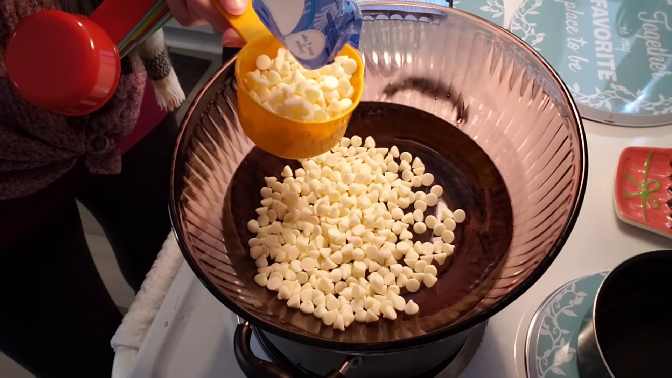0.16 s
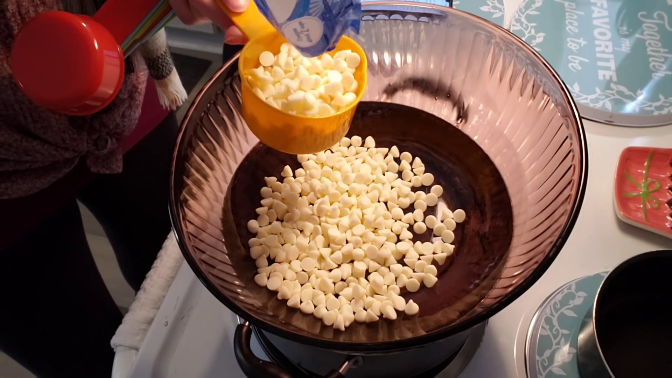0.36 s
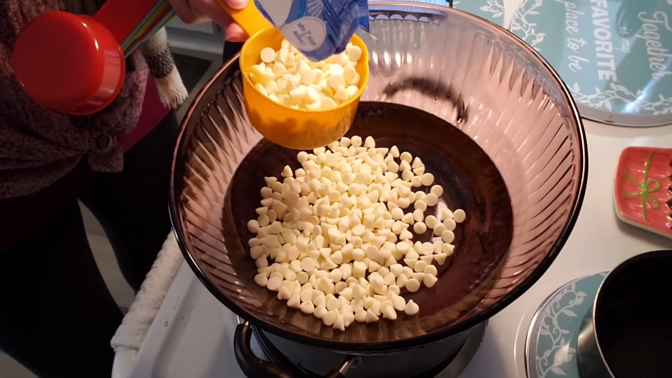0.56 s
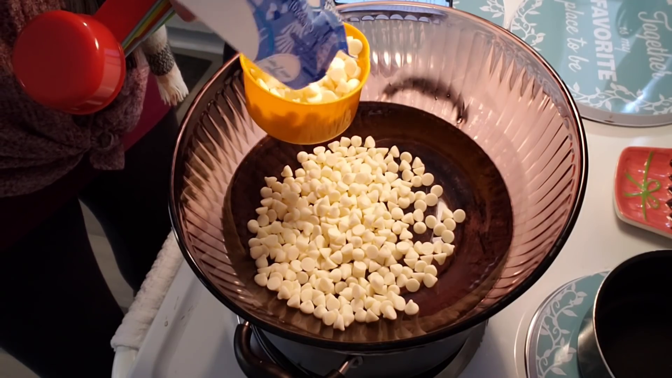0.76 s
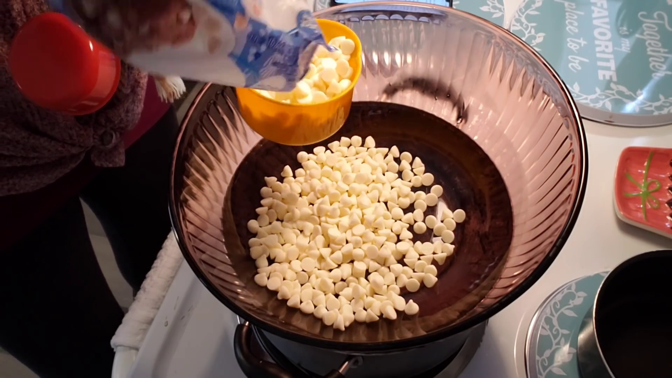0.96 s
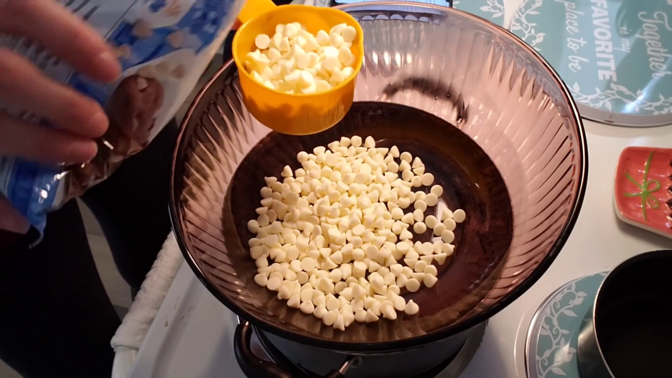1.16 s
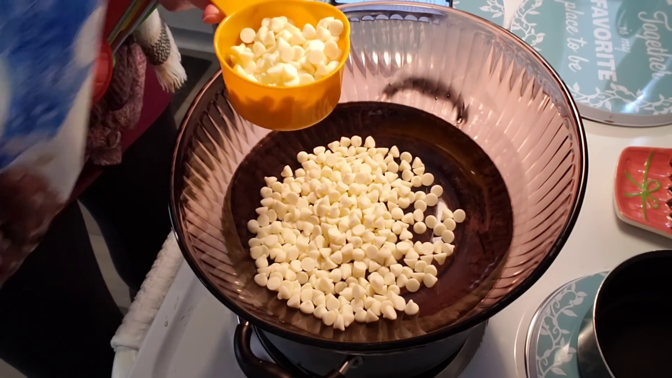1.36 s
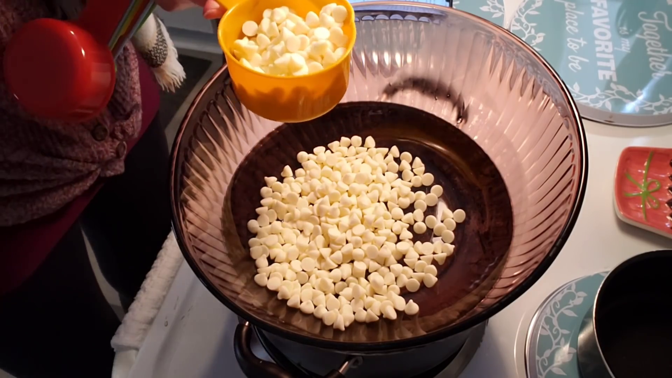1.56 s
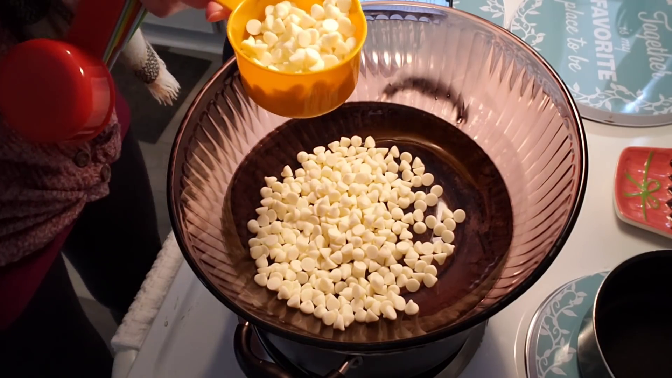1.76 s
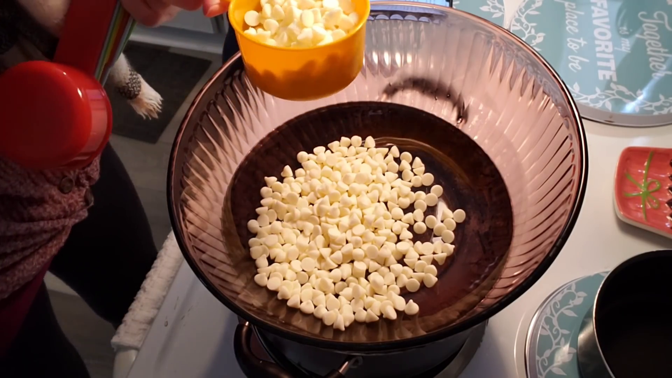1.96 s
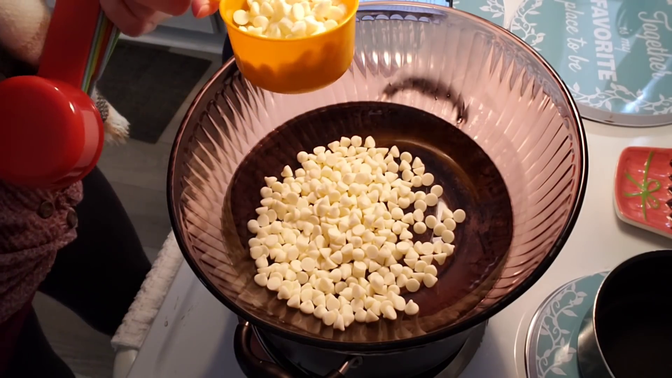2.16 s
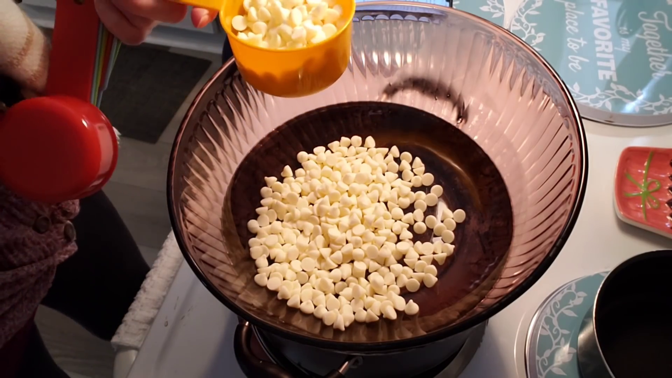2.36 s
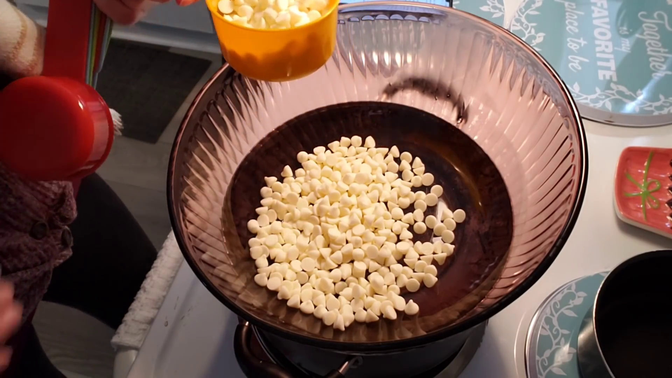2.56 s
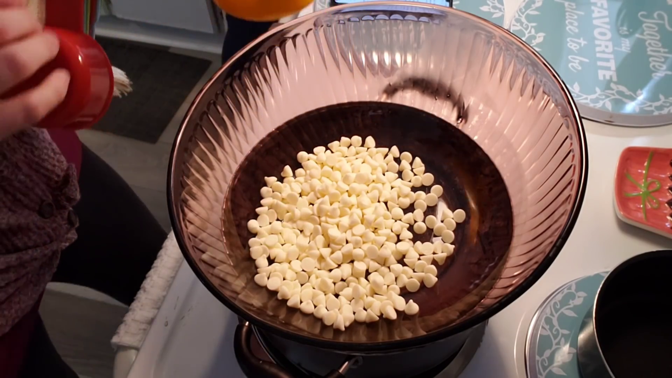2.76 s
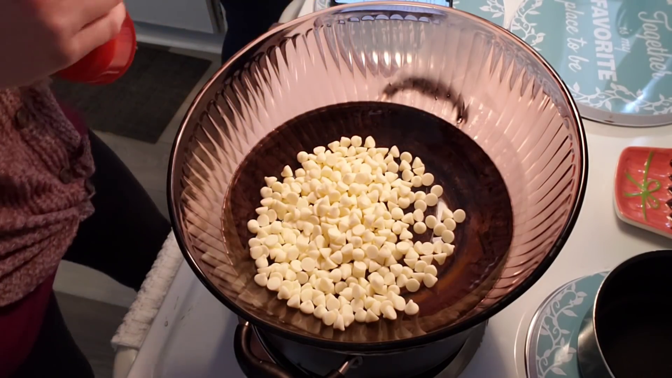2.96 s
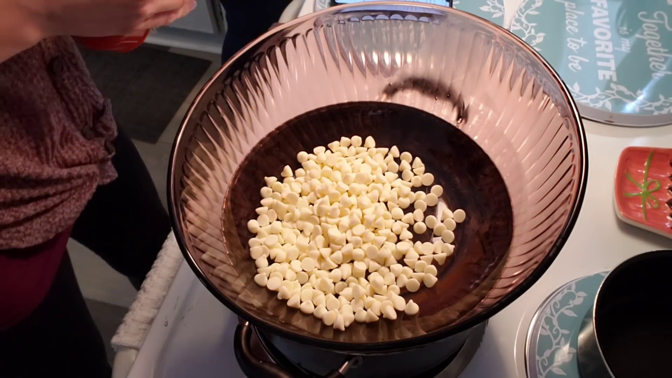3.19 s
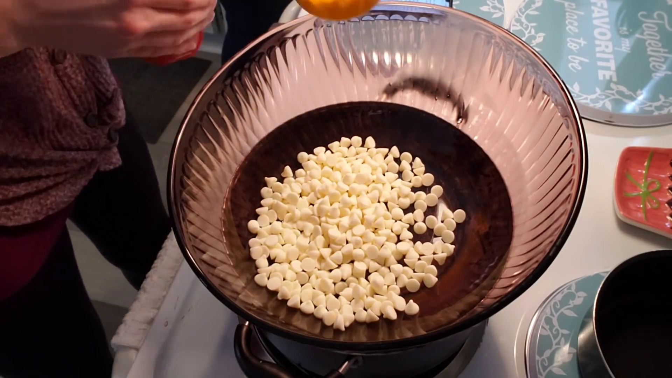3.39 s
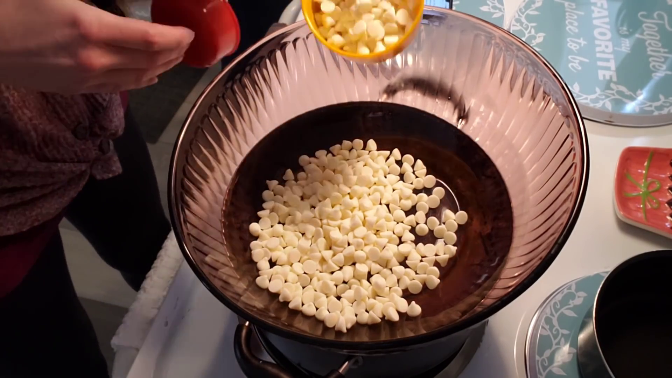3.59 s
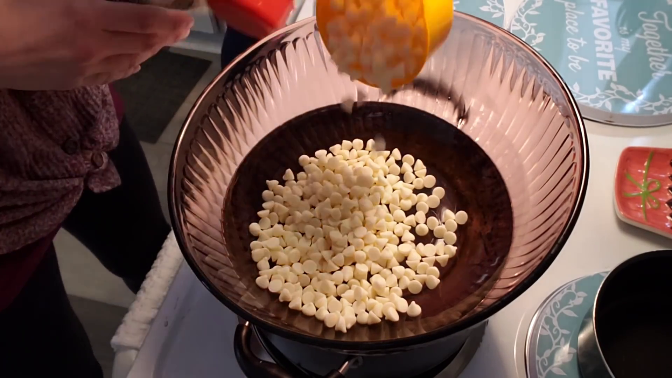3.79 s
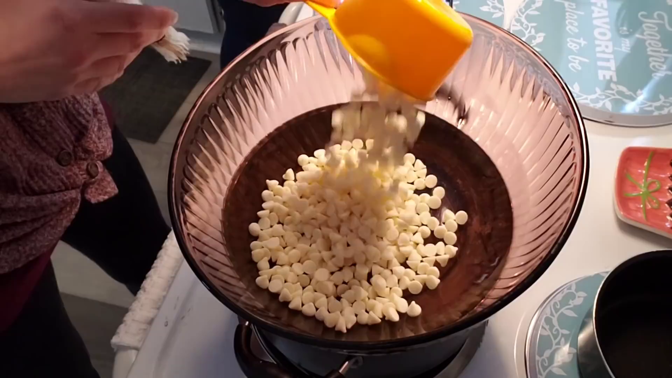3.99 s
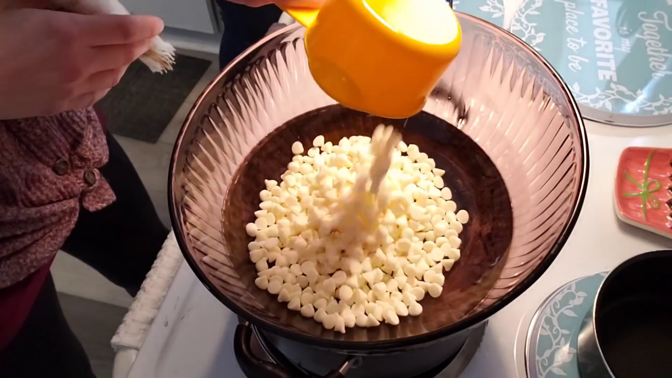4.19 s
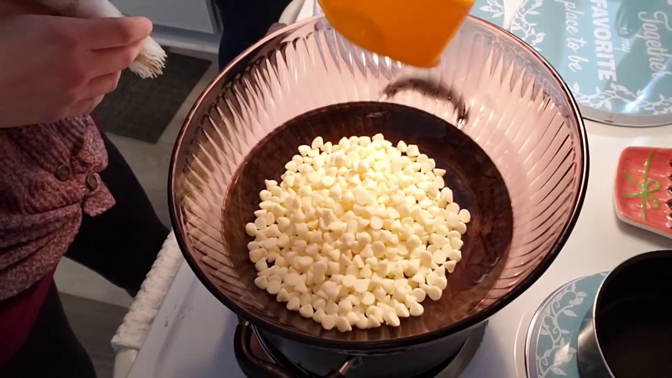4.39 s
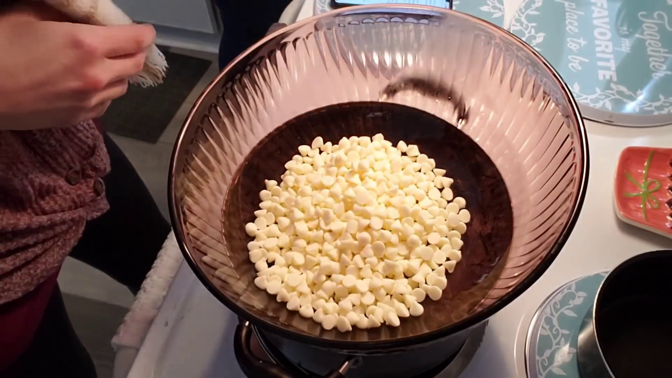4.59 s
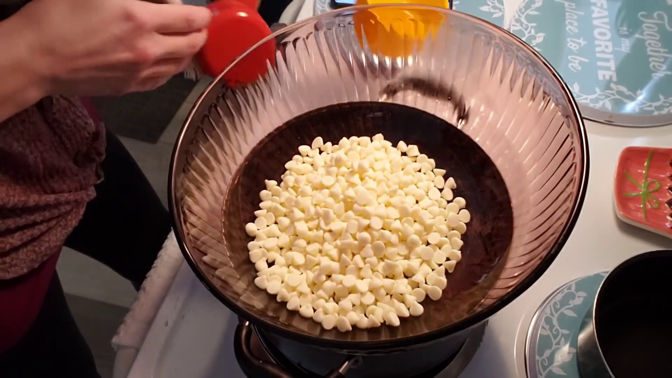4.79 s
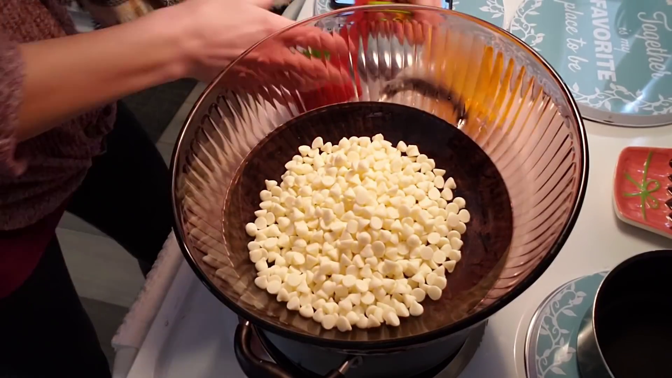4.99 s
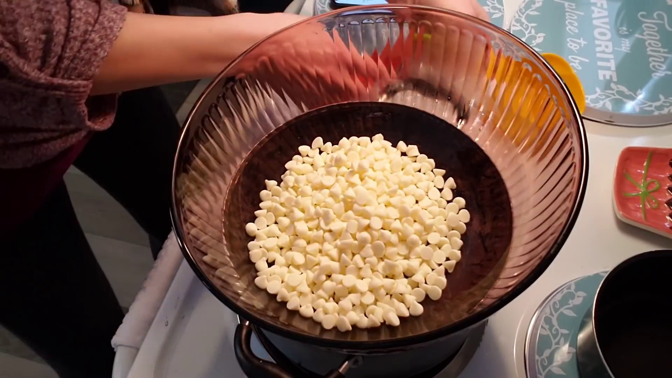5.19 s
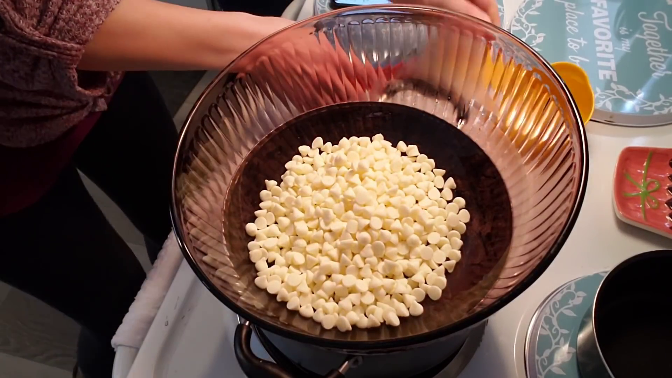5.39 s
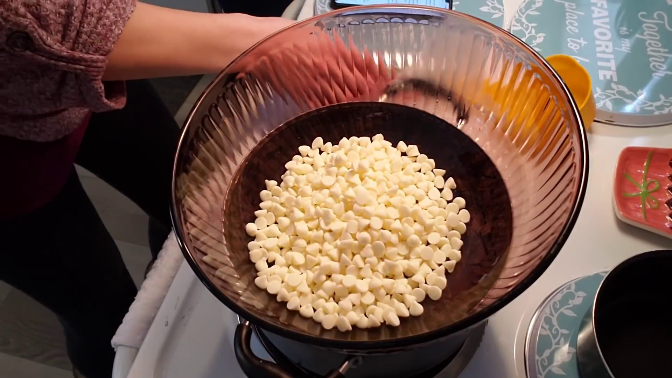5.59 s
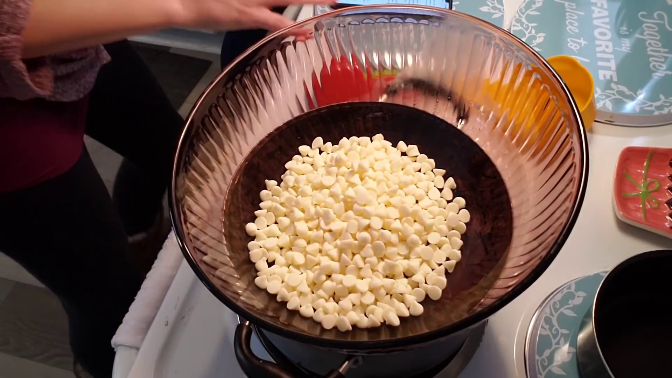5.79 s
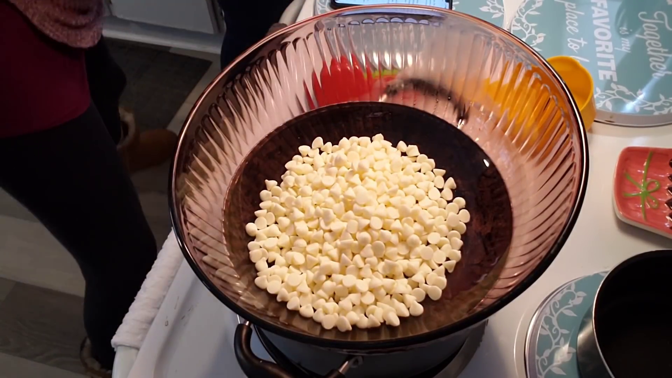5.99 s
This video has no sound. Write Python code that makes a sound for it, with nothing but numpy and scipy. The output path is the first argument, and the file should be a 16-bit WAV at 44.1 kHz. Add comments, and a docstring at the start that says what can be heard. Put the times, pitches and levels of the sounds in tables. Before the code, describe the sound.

A plastic bag is shaken and put away with scattered crackles, briefly dragging over a measuring cup. The cup knocks a glass bowl, which rings, and chocolate chips pour onto a heap inside with a short, bright clatter. Then plastic cups are set down, rattling on a metal stove top that booms softly. It is all heard from close by in a kitchen with a faint appliance hum.

```python
"""Chocolate chips pour onto a heap in a glass bowl, each impact exciting the bowl's resonances.
Before that, their plastic bag is shaken and put away, crackling and dragging over a measuring cup,
and the cup knocks the bowl, whose modes ring freely. Afterwards plastic cups are set down rattling
on a stove top, whose sheet metal booms. A kitchen appliance hums softly, the hard room adds a short
reverberant tail, and two microphone ports hear it all from close by."""
import sys
import numpy as np
from scipy import signal
from scipy.fft import rfft, irfft, next_fast_len
from scipy.io import wavfile
from scipy.ndimage import uniform_filter1d

SR = 44100
rng = np.random.default_rng(int(sys.argv[2]) if len(sys.argv) > 2 else 0)


def file_out(sig):
    """Save sig as 16-bit WAV at sys.argv[1]."""
    # one column per channel
    cols = np.atleast_2d(sig).T
    # limit, then scale
    lim = np.clip(cols, -1, 1)
    pcm = np.round(lim * 32767).astype(np.int16)
    wavfile.write(sys.argv[1], SR, pcm)


N = 266805

# Single chips landing. Each row: start in seconds, level in dB, brightness in dB, bowl ring in dB.
CHIP_LANDINGS = [(3.6162, -46, -19, -7.5), (3.688, -35, 0, -10.5), (3.7074, -41.5, 1, -1.5),
                 (3.732, -25.5, -1, -18), (3.7451, -25.5, -1, -16), (3.7594, -37, -0.5, -5),
                 (3.789, -19.5, -2.5, -18), (3.8078, -25, 2.5, -9), (3.8197, -29, -7, -8),
                 (3.837, -13.5, -2.5, -15), (3.8464, -20, -0.5, -5.5), (3.86, -22.5, -11.5, -8),
                 (3.917, -21, -2, -10), (3.9468, -25.5, 9, -5), (4.0387, -13.5, 4.5, 2.5),
                 (4.091, -21.5, 12.5, -9.5), (4.1206, -20.5, 14, 1), (4.2636, -29, 19, -6),
                 (4.3185, -26, 8, -17), (4.36, -40.5, 11, -23), (4.443, -47.5, 16, -25),
                 (4.4852, -41.5, 2, -28)]
# The stream of chips. Each row: time in seconds, level in dB.
POUR_LEVELS = [(3.84, -33), (3.94, -54.5), (3.967, -32), (4.03, -31.5), (4.12, -33.5), (4.22, -38.5),
               (4.3, -50), (4.39, -69.5), (4.6, -78)]
# Spectrum of impacts on the heap. Each row: frequency in Hz, relative density in dB.
HEAP_SPECTRUM = [(180, -47.5), (300, -34.5), (536, -5), (622, -18.5), (1330, -11.5), (2050, -5),
                 (3160, -4.5), (3610, -2.5), (4630, -3.5), (5840, -0.5), (8270, 0.5), (10300, 8.5),
                 (15800, 4)]
# Resonances of the bowl under the chips. Each row: frequency in Hz, bandwidth in Hz, level in dB.
BOWL_RESONANCES = [(2050, 120, -4), (2710, 170, -10.5), (3640, 160, 10), (4200, 250, -6), (5720, 200, -5)]
# Snaps of the bag. Each row: start in seconds, level in dB, brightness in dB, pitch in Hz, ring in dB.
BAG_SNAPS = [(0.0207, -46, -17.5, 1780, -2), (0.057, -39.5, -7.5, 2170, -4), (0.0806, -32, 4, 3740, -4),
             (.0948, -38, 6, 3640, -9), (0.1058, -38.5, 13, 1460, 0.5), (0.1323, -31.5, -5.5, 2900, 1),
             (0.1893, -37, -0.5, 1340, 2), (0.2786, -44, 2, 2530, -6), (.55, -24.5, 2, 2870, -16),
             (.7155, -42, -9, 4190, 6.5), (0.7774, -19, -1, 1720, 12), (0.97, -40, 5.5, 3660, 0),
             (0.991, -39.5, 2, 1820, 3), (1.048, -31.5, 12, 1390, -5), (1.062, -32, -2, 2260, -17),
             (1.1134, -27.5, 9, 1860, -5), (1.43, -39.5, -2, 4650, 2), (1.4602, -27, 2.5, 2160, -14),
             (1.545, -24, 0, 3300, -5), (2.009, -43, -10, 1380, 10), (2.0676, -31, 1, 1730, -1),
             (2.1016, -39, -14, 1250, -4), (2.143, -25.5, -7.5, 2080, -2.5), (2.1748, -40, 16.5, 1850, -13),
             (2.2646, -41.5, 8.5, 1640, -4), (2.362, -51.5, 14.5, 914, -7), (2.4815, -47.5, 14.5, 2120, -7),
             (2.886, -43.5, 17, 1110, -9), (3.1247, -50.5, 0, 991, -14)]
# Rustle of bag and sleeves. Each row: time in seconds, level in dB.
RUSTLE_LEVELS = [(0, -32), (.06, -75.5), (.25, -82), (.59, -75), (.74, -62), (.765, -42), (.84, -55),
                 (.96, -67), (1.15, -76), (1.77, -77.5), (1.85, -61), (2.05, -67.5), (2.12, -48.5),
                 (2.25, -72.5), (2.52, -66.5), (2.62, -100), (3.48, -79), (3.63, -63), (3.7, -88)]
# Spectrum of the bag. Each row: frequency in Hz, relative density in dB.
BAG_SPECTRUM = [(290, -9), (500, -7.5), (639, -14.5), (841, -9.5), (1110, -11.5), (3270, -8), (3620, -8),
                (5120, -10), (6540, -5), (12500, 0.5), (15800, -0.5)]
# Cups touched and set down. Each row: start in seconds, level in dB, brightness in dB,
# T60 in seconds, pitch in Hz, ring in dB.
CUP_BLOWS = [(4.8146, -39.5, -0.5, 0.089, 1330, -1), (4.8791, -42.5, -4, 0.064, 690, -13),
             (5.0323, -42.5, 4, .076, 1015, 6.5), (5.0545, -17.5, -6, 0.17, 451, 1.5),
             (5.0636, -23.5, -13.5, 0.11, 947, 5), (5.1426, -30, -8, 0.084, 1390, 11),
             (5.1625, -21, 0.5, 0.17, 1950, -0.5), (5.1985, -18.5, 2, 0.069, 687, -8.5),
             (5.3059, -22.5, -4.5, 0.11, 2830, 0), (5.49, -19.5, 13.5, 0.086, 5740, -7),
             (5.4942, -9.5, 8, 0.15, 5700, -10), (5.5059, -11, 3.5, 0.082, 708, -2),
             (5.5196, -13.5, 0.5, 0.15, 1260, -6), (5.5522, -10.5, 4, 0.11, 2420, -7.5),
             (5.6058, -33, 0, .086, 2000, -2), (5.7054, -28, 0.5, 0.083, 1440, 4.5)]
# Cups rattling and sliding. Each row: time in seconds, level in dB.
RATTLE_LEVELS = [(4.78, -80), (4.84, -64), (5.03, -79.5), (5.11, -49), (5.22, -41), (5.38, -53),
                 (5.48, -56.5), (5.64, -56), (5.9, -73.5)]
# Spectrum of cup impacts. Each row: frequency in Hz, relative density in dB.
CUP_SPECTRUM = [(88, -34), (150, -7), (217, -30), (375, -6.5), (622, -8.5), (699, -9.5), (817, -11.5),
                (1230, -9.5), (2000, -12.5), (2390, -6.5), (8150, -3), (10300, 3), (15800, -3.5)]
# Ring of cups against the stove top. Each row: frequency in Hz, bandwidth in Hz, level in dB.
CUP_RESONANCES = [(398, 80, 1), (517, 78, -1.5), (720, 90, -2), (940, 87, 2), (1236, 134, -2),
                  (1410, 130, -1), (1930, 160, -0.5), (2460, 200, 1), (2870, 150, 8.5), (5760, 340, -0.5)]
# The cup knocking the bowl. Each row: start in seconds, level in dB, left minus right in dB.
KNOCKS = [(3.438, -23, 1.5)]
# Modes of the glass. Each row: frequency in Hz, relative level in dB, T60 in seconds.
GLASS_MODES = [(520, -4, .5), (672, 0.5, .45), (1066, -7.5, .26), (1184, -1.5, .4), (1410, -1, 0.32),
               (1723, -14, .26), (2500, -5.5, 0.42), (3380, -6.5, 0.16), (4151, -13, .2)]
# The dull clunk of cup and rim. Each row: frequency in Hz, relative level in dB, T60 in seconds.
CLUNK_MODES = [(255.6, -1.5, 0.11), (530, -2, 0.08), (1106, 1, 0.047), (1450, 6, 0.025)]
# The bag dragging over the measuring cup. Each row: time in seconds, level in dB.
DRAG_LEVELS = [(.7, -71), (.75, -52), (.7765, -35), (.7785, -20.5), (.793, -36), (.85, -40), (.9, -48.5),
               (1.0, -60)]
# The hollow of the measuring cup. Each row: frequency in Hz, bandwidth in Hz, level in dB.
CUP_CAVITY = [(1180, 120, -2), (1580, 120, 0), (1900, 170, -1), (4150, 130, -9)]
# A faint scrape as the cup is handled. Each row: time in seconds, level in dB.
SCRAPE_LEVELS = [(2.2, -80), (2.35, -77), (2.55, -66.5), (2.68, -100), (2.87, -99), (2.9, -60), (3.02, -75)]
# The ring of that scrape. Each row: frequency in Hz, bandwidth in Hz, level in dB.
SCRAPE_RESONANCES = [(2290, 260, 0), (3170, 730, -4)]
# Booms of the stove top under the cups. Each row: start in seconds, level in dB.
STOVE_BOOMS = [(5.057, -31), (5.201, -35), (5.499, -41)]
# Low modes of the stove top. Each row: frequency in Hz, relative level in dB, T60 in seconds.
STOVE_MODES = [(126.6, 2.5, .22), (85.4, -8.5, 0.76)]
# Decay of the kitchen. Each row: frequency in Hz, T60 in seconds.
ROOM_T60 = [(200, 0.66), (1000, 0.41), (4000, 0.39), (12000, 0.21)]
# Appliance tones. Each row: frequency in Hz, level in dB.
HUM_TONES = [(48.26, -67), (59.4, -55.5), (65.0, -58.5), (96.5, -67), (120, -64.5), (135.2, -57),
             (193.05, -51), (270.4, -66.5), (386.1, -78.5), (482.6, -64.5), (772, -70.5)]
# Spectrum of the air noise. Each row: frequency in Hz, relative density in dB.
AIR_SPECTRUM = [(18, -34.5), (30, -28.5), (59, -3), (98, -30), (198, -1.5), (318, -10.5), (483, -11.5),
                (628, -14.5), (775, -16), (2390, -42), (5680, -51), (6830, -34.5), (8420, -58.5),
                (10100, -39), (15800, -58.5)]
# Gain applied to the background hum and hiss: a slow drift, then a slight fade-out at the end.
# Each row: time in seconds, gain in dB.
BACKGROUND_GAIN = [(0, -0.5), (.5, 1.5), (2, 1.5), (4.2, 3), (4.7, 0.5), (5.6, 1), (5.8, -3), (6.05, -3.5)]
# The two microphone ports. Each row: frequency in Hz, left minus right in dB, side gain in dB.
PORT_RESPONSE = [(60, 1.5, -4), (254.5, 0, -9.5), (490, 3, -6), (1500, 0, 0), (5000, 2.5, 0),
                 (8600, 1.5, 1.5), (10700, 10.5, 1), (12740, -5.5, -2), (15400, -4, 0)]


def pouring_chips():
    """Impact excitation: chips sound the bowl, and brighten as the heap grows away from the glass."""
    out = stream(POUR_LEVELS, HEAP_SPECTRUM, clump_db=1.5, bass_db=-7.5, treble_db=2.1,
                 brighten_db_per_s=9, modes=BOWL_RESONANCES, ring_db=-12.5)
    for start, db, bright_db, ring_db in CHIP_LANDINGS:
        add(out, start, burst(db, bright_db, HEAP_SPECTRUM, BOWL_RESONANCES, ring_db,
                              bass_db=-9, treble_db=-5, rise_ms=1.8, t60=0.055))
    return out


def crackling_bag():
    """Impulsive emission: shaken plastic film rustles and snaps, each snap with one damped resonance."""
    out = stream(RUSTLE_LEVELS, BAG_SPECTRUM, clump_db=2.5, bass_db=2.5, treble_db=2.0)
    snap_q = 5.9
    for start, db, bright_db, hz, ring_db in BAG_SNAPS:
        add(out, start, burst(db, bright_db, BAG_SPECTRUM, [(hz, hz / snap_q, 0)], ring_db,
                              bass_db=-2, treble_db=-2.5, rise_ms=1.64, t60=0.039))
    return out


def clattering_cups():
    """Selective excitation: over a running rattle, each blow rings the cup modes nearest its pitch."""
    out = stream(RATTLE_LEVELS, CUP_SPECTRUM, clump_db=1.1, bass_db=7.5, treble_db=-6.5)
    falloff = 45.5  # dB per octave squared
    for start, db, bright_db, t60, pitch_hz, ring_db in CUP_BLOWS:
        modes = [(hz, width, mode_db - falloff * np.log2(hz / pitch_hz) ** 2)
                 for hz, width, mode_db in CUP_RESONANCES]
        add(out, start, burst(db, bright_db, CUP_SPECTRUM, modes, ring_db,
                              bass_db=-2, treble_db=-2, rise_ms=2.27, t60=t60))
    return out


def bowl_knock():
    """Free vibration: the cup strikes with a clunk and a crack, and the glass rings on in its modes."""
    out, t = np.zeros((2, N)), np.arange(SR // 2) / SR
    low, mid, high = bands(rng.standard_normal(len(t)), CUP_SPECTRUM)
    crack = (low + gain_of(-6.0) * mid + gain_of(-5.5) * high) * decay(t, t60=0.19)
    thump = gain_of(-4) * struck_modes(CLUNK_MODES, t) + gain_of(-11.5) * crack
    ring = gain_of(-17) * struck_modes(GLASS_MODES, t)
    bounce_s, bounce_db = .0062, -15  # the cup lands a second time
    for start, db, pan_db in KNOCKS:
        add(out, start, panned(gain_of(db) * (ring + thump), pan_db))
        add(out, start + bounce_s, panned(gain_of(db + bounce_db) * thump, pan_db))
    return out


def cup_friction(levels, modes):
    """Stick-slip friction: a run of tiny impacts on the rim drives the cup's resonances."""
    times, db = np.transpose(levels)
    t = np.arange(times[0], times[-1], 1 / SR)
    slips = patter(len(t), per_s=1700, spread_db=1.0, width=0.67)
    out = np.zeros((2, N))
    add(out, times[0], resonate(slips, modes) * gain_of(np.interp(t, times, db)))
    return out


def stove_booms():
    """Plate vibration: the sheet metal swings softly in its low modes under the cups."""
    out, t = np.zeros((2, N)), np.arange(SR // 2) / SR
    rise = 1 - np.exp(-t / 0.013)
    for start, db in STOVE_BOOMS:
        add(out, start, panned(gain_of(db) * rise * struck_modes(STOVE_MODES, t), 0))
    return out


def stream(levels, spectrum, clump_db, bass_db, treble_db, brighten_db_per_s=0, modes=(), ring_db=-99):
    """Shot noise: dense impacts come in clumps under a slow envelope and may ring a vessel."""
    times, db = np.transpose(levels)
    t = np.arange(times[0], times[-1], 1 / SR)
    hits = patter(next_fast_len(len(t)), per_s=5000, spread_db=1.0, width=1.0)
    hits = hits * gain_of(clump_db * slow_noise(hits.shape[1], span=120))
    low, mid, high = (band[:, :len(t)] for band in bands(hits, spectrum))
    bright_db = brighten_db_per_s * (t - times[0])
    sound = mid + gain_of(bass_db - bright_db) * low + gain_of(treble_db + bright_db) * high
    if modes:
        sound = sound + gain_of(ring_db) * resonate(hits[:, :len(t)], modes)
    envelope = gain_of(np.interp(t, times, db)) * signal.windows.tukey(len(t), .02)
    out = np.zeros((2, N))
    add(out, times[0], sound * envelope)
    return out


def burst(db, bright_db, spectrum, modes, ring_db, bass_db, treble_db, rise_ms, t60):
    """Transient response: a dying cluster of impacts rings a body; brightness trades bass for treble."""
    t = np.arange(8192) / SR
    low, mid, high = bands(patter(len(t), per_s=9000, spread_db=2.8, width=0.93), spectrum)
    impacts = mid + gain_of(bass_db - bright_db) * low + gain_of(treble_db + bright_db) * high
    ring = gain_of(ring_db) * resonate(low + mid, modes)
    rise = 1 - np.exp(-(1000 * t / rise_ms) ** 2)
    tick = gain_of(-1) * decay(t, t60=0.0086)  # the first impact stands out briefly
    crest_db = 8  # allowance for peaks above the rms
    return (impacts + ring) * gain_of(db - crest_db) * rise * (decay(t, t60) + tick)


def patter(count, per_s, spread_db, width):
    """Spatial spread: impacts at many places reach the two sides unequally."""
    mid, side = clicks(count, per_s, spread_db), clicks(count, per_s, spread_db)
    return np.array([mid + width * side, mid - width * side])


def clicks(count, per_s, spread_db):
    """A Poisson process: independent impulses of random sign, a few larger than the rest."""
    chance, sign, size = rng.random((count, 3)).T
    return (chance < per_s / SR) * np.sign(sign - .5) * gain_of(-spread_db * np.log(size + 0.015))


def resonate(x, modes):
    """Forced resonance: a body answers each impact in narrow bands; the sum has rms 1."""
    return unit_rms(sum(gain_of(db) * unit_rms(signal.lfilter(*signal.iirpeak(hz, hz / width, SR), x))
                        for hz, width, db in modes))


def struck_modes(modes, t):
    """Modal superposition: a struck body sounds as a sum of damped sinusoids."""
    return sum(gain_of(db) * decay(t, t60) * np.sin(2 * np.pi * hz * t) for hz, db, t60 in modes)


def bands(x, spectrum):
    """Crossover filtering: x is coloured and split into bass, middle and treble, each of rms 1."""
    hz = np.fft.rfftfreq(x.shape[-1], 1 / SR)
    coloured = rfft(x) * gain_of(at_frequency(spectrum, hz))
    low, high = 1 / (1 + (hz / 2000) ** 6), 1 / (1 + (7000 / (hz + 1)) ** 10)
    return [unit_rms(irfft(coloured * share, x.shape[-1])) for share in (low, 1 - low - high, high)]


def kitchen_reverb(x):
    """Reverberation: reflections of random sign, one per 20 samples, decay at each band's own rate."""
    taps = np.zeros((2, SR))
    arrivals = np.arange(120, SR - 20, 20) + rng.integers(0, 20, (2, (SR - 121) // 20))
    np.put_along_axis(taps, arrivals, rng.choice([-1., 1.], arrivals.shape), 1)
    hz, t, spectra = signal.stft(taps, SR, nperseg=256)
    tail = signal.istft(spectra * decay(t, at_frequency(ROOM_T60, hz)[:, None]), SR, nperseg=256)[1]
    return signal.fftconvolve(x, tail / np.linalg.norm(tail[0]), axes=1)[:, :N]


def room_tone():
    """Continuous and line spectra: smooth air noise lies under slightly wavering appliance tones."""
    frames, hz = N // 512 + 5, np.fft.rfftfreq(2048, 1 / SR)
    left_re, left_im, right_re, right_im = rng.standard_normal((frames, 1025, 4)).T
    white = np.array([left_re + 1j * left_im, right_re + 1j * right_im])
    spectra = white * gain_of(at_frequency(AIR_SPECTRUM, hz))[:, None]
    air = gain_of(-51) * unit_rms(signal.istft(spectra, nperseg=2048, noverlap=1536)[1][:, :N])
    hum, t = np.zeros(N), np.arange(N) / SR
    for tone_hz, db in HUM_TONES:
        waver = 1 + 0.15 * (slow_noise(N, span=9000) + 1j * slow_noise(N, span=9000))
        phasor = np.exp(2j * np.pi * (tone_hz * t + rng.random()))
        hum += gain_of(db + 1.0) * (waver * phasor).real
    return (air + hum) * gain_of(np.interp(t, *np.transpose(BACKGROUND_GAIN)))


def slow_noise(count, span):
    """Low-pass filtering: noise averaged twice over span samples wanders slowly, at rms 1."""
    return unit_rms(uniform_filter1d(uniform_filter1d(rng.standard_normal(count), span), span))


def decay(t, t60):
    """Exponential damping: the level falls 60 dB in t60 seconds."""
    return gain_of(-60 * t / t60)


def gain_of(db):
    """The decibel scale: 20 dB is a factor of ten in amplitude."""
    return 10 ** (np.asarray(db) / 20)


def unit_rms(x):
    """Normalisation: scales x to rms 1."""
    return x / np.sqrt(np.mean(x ** 2) + 1e-20)


def at_frequency(points, hz):
    """Interpolation: reads a table on a log-frequency axis."""
    table_hz, values = np.transpose(points)
    return np.interp(np.log(hz + 1), np.log(table_hz + 1), values)


def panned(x, pan_db):
    """Level difference: the left side exceeds the right by pan_db."""
    return np.array([x * gain_of(pan_db / 2), x * gain_of(-pan_db / 2)])


def add(mix, start, sound):
    """Superposition: a sound joins the mix at start seconds."""
    part = mix[:, round(start * SR):][:, :sound.shape[1]]
    part += sound[:, :part.shape[1]]


def scene():
    """Direct and reverberant fields: the bowl stands nearest, so it has the least room sound."""
    bag = crackling_bag()
    chips = pouring_chips()
    cups = clattering_cups()
    cups += cup_friction(DRAG_LEVELS, CUP_CAVITY)
    cups += cup_friction(SCRAPE_LEVELS, SCRAPE_RESONANCES)
    bowl = chips + bowl_knock()
    into_room = gain_of(-13) * bowl + gain_of(-7.0) * bag + gain_of(-9.0) * cups
    return bowl + bag + cups + stove_booms() + kitchen_reverb(into_room) + room_tone()


def record(dry):
    """Acoustic shadowing: close ports hear the bass much alike and shade each other in the treble."""
    size = next_fast_len(N)
    left, right = rfft(dry, size)
    hz = np.fft.rfftfreq(size, 1 / SR)
    port_hz, lean_db, side_db = np.transpose(PORT_RESPONSE)
    mid = (left + right) / 2
    side = (left - right) / 2 * gain_of(at_frequency(np.c_[port_hz, side_db], hz))
    shading = panned(0.96, at_frequency(np.c_[port_hz, lean_db], hz))
    ports = irfft(np.array([mid + side, mid - side]) * shading, size)[:, :N]
    rounded = .9 * np.tanh(ports / .9)  # the input stage rounds the highest peaks
    band_limit = signal.firwin(511, cutoff=15850, window=("kaiser", 9), fs=SR)
    return signal.oaconvolve(rounded, band_limit[None], "same")


dry = scene()
out = record(dry)
file_out(out)
```